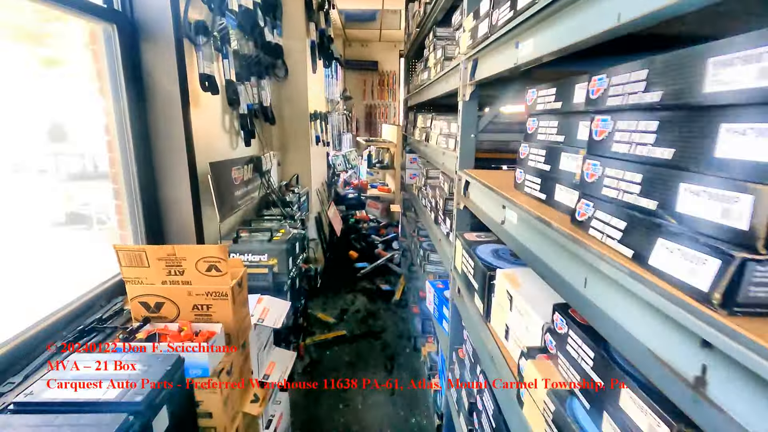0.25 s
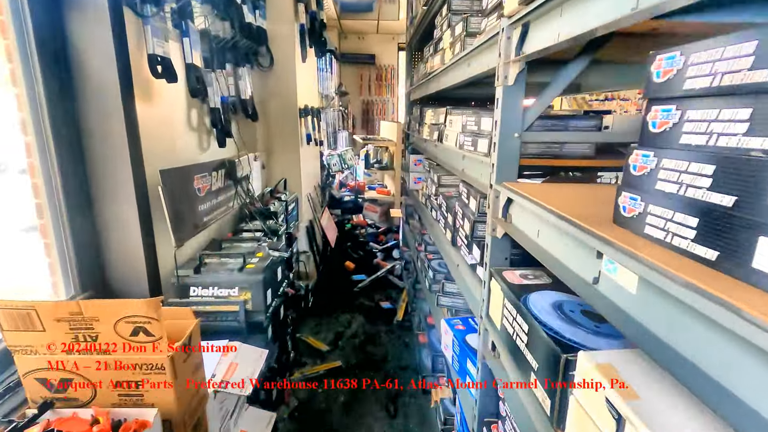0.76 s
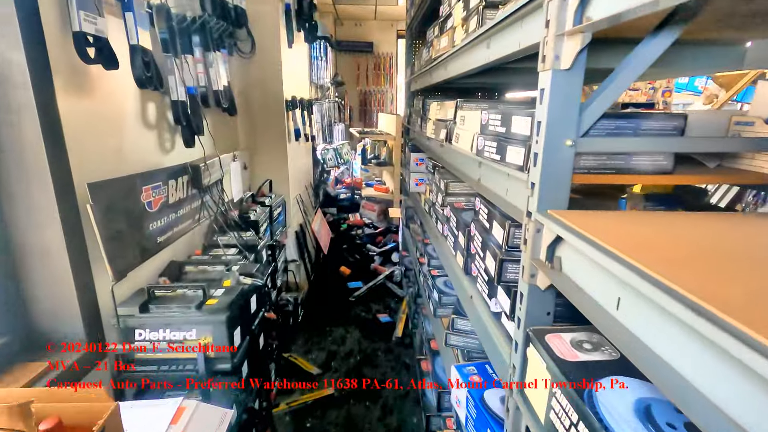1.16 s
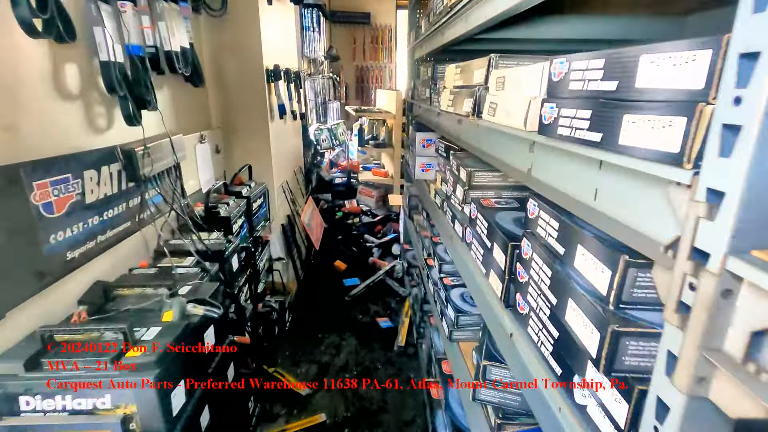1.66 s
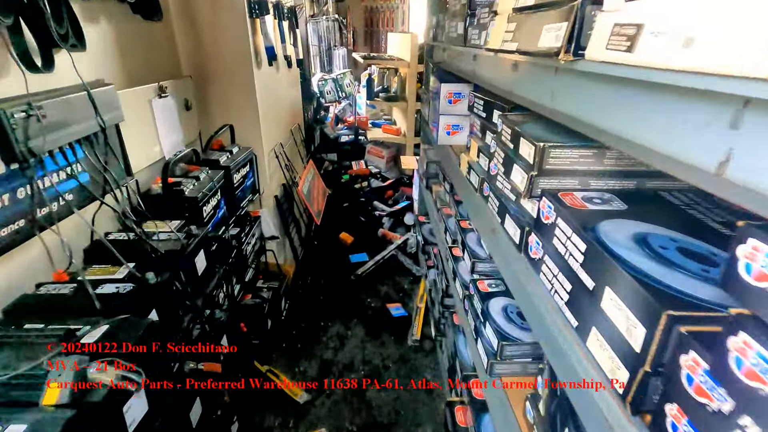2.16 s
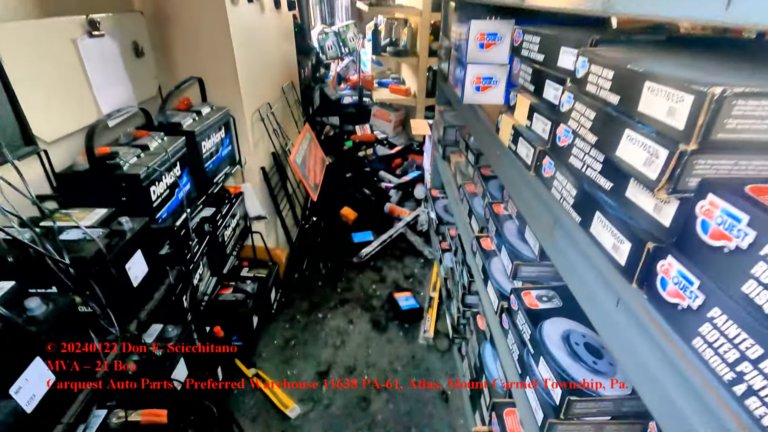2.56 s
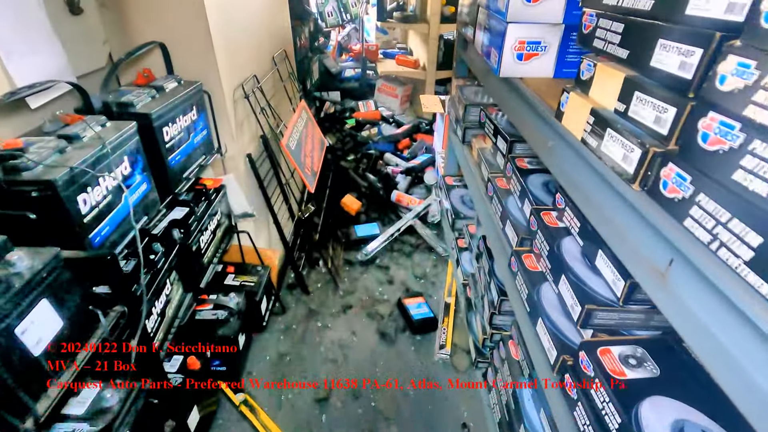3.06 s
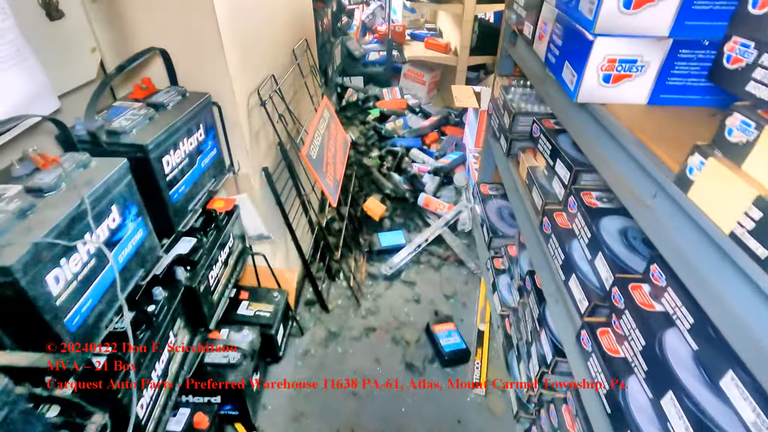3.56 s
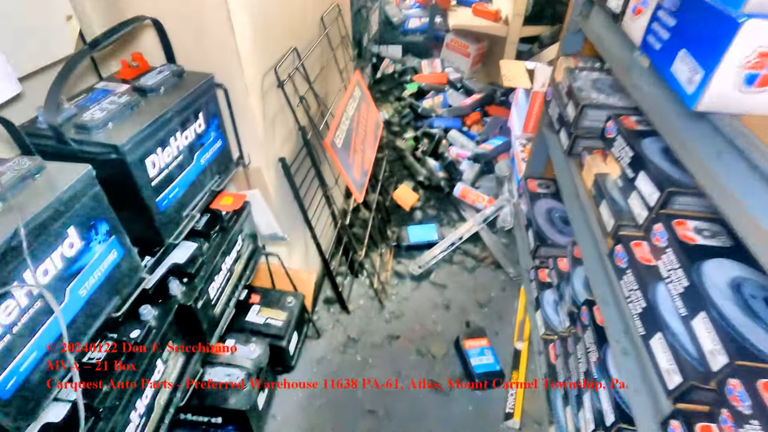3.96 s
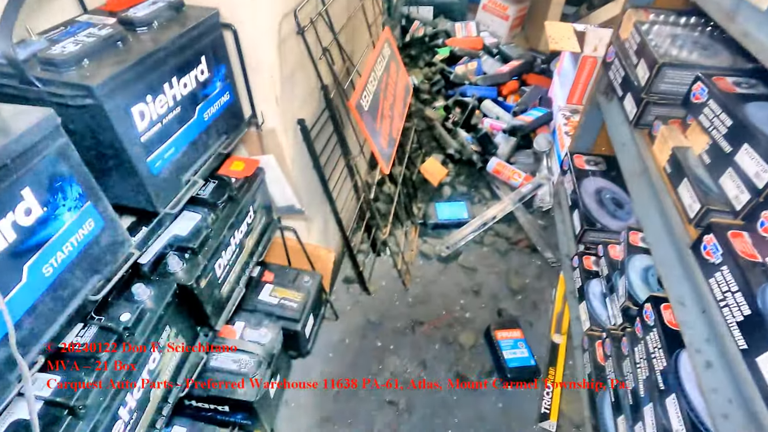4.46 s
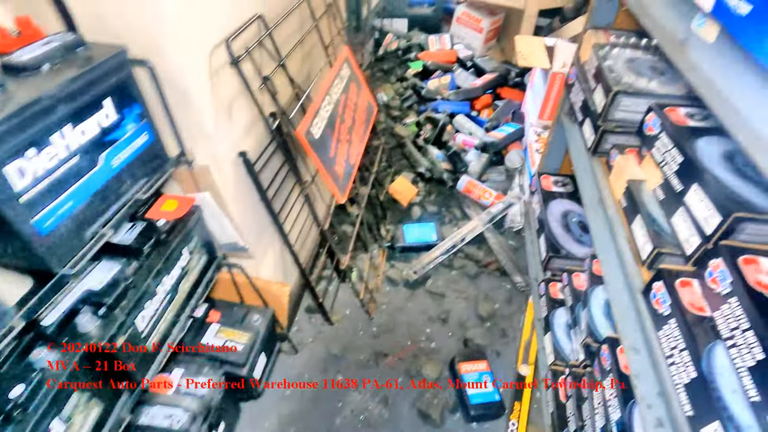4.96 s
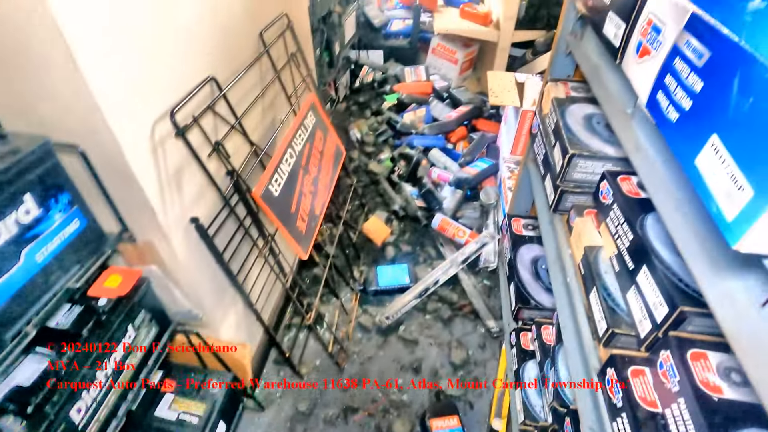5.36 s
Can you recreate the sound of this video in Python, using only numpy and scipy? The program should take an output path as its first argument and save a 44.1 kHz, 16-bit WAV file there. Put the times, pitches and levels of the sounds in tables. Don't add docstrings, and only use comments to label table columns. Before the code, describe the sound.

Slow gritty footsteps drag and crunch over loose debris on a concrete floor while a deep engine rumble throbs steadily outside.

```python
import sys
import numpy as np
from scipy import signal
from scipy.fft import rfft, irfft, next_fast_len
from scipy.io import wavfile

SR = 44100
rng = np.random.default_rng(int(sys.argv[2]) if len(sys.argv) > 2 else 0)


def generate_wav(sig):
    pcm = np.round(np.clip(np.atleast_2d(sig).T, -1, 1) * 32767).astype(np.int16)
    wavfile.write(sys.argv[1], SR, pcm)


def natural_amplitude(level_db):
    exponent = np.asarray(level_db, float) / 20
    return 10 ** exponent


N = 247822

# (firing rate [Hz], time of one firing [s], phase turn on the way in [rad])
ENGINES = [(35.03, -.0089, -.9), (37.55, .0007, 1.44), (30.02, 0, 2.8), (31.7, -.014, 2.6)]
ENGINE_ORDERS = [(0, 1), (0, 1.5), (0, 5 / 3), (0, 2), (0, 2.5), (0, 3), (0, 4), (1, 1), (1, 1.5), (1, 2),
                 (1, 2.5), (1, 3), (2, 1), (2, 2), (3, 1), (3, 2)]
# (mean rms [dB], swing [dB], loudest at [s])
STANDING_WAVES = [(-23.5, 0.97, 3), (-65, 11, -3.5), (-48.5, -5, -3), (-30, 2, 2.2), (-73, 9, 12),
                  (-45, 4.5, 0), (-62.5, 7.5, 0), (-32, 6.5, -2.5), (-60, 11, 7), (-42, 4.5, 1.4),
                  (-53.5, 5, 3.5), (-50.5, 2.5, 0.5), (-47.5, 10.5, 5.5), (-42, 2, 4), (-46.5, 2, 1),
                  (-52.5, 5.5, 4.5)]
WALK_M_PER_S, SOUND_M_PER_S = 0.4, 343

# (frequency [Hz], density [dB per Hz])
ROAR_SPECTRUM = [(20, -32), (40, -2.5), (65, 2), (100, -5), (150, -14), (230, -21), (500, -22.5),
                 (780, -28.5), (1000, -22.5), (1400, -23.5), (2500, -33), (4200, -35.5), (7500, -50),
                 (12000, -36)]
# (frequency [Hz], width [Hz], level [dB])
ROAR_WHINE = (1030, 28, 6.9)
ROAR_DB = -36.5

# (frequency [Hz], likeness [0..1])
LIKENESS = [(60, .9997), (150, .994), (300, .94), (600, .87), (1200, .76), (2400, .74), (5000, .48),
            (9000, .5), (13000, .72)]
# (frequency [Hz], left minus right [dB])
PORT_LEAN = [(700, 0), (1400, -.4), (2800, 1.6), (5500, 4.6), (8500, 7), (12000, 0)]

# (frequency [Hz], density [dB per Hz])
GRIT_SPECTRUM = [(130, -5), (258, -13.5), (380, -8.5), (450, -6), (780, -10), (984, -5), (1390, -6.5),
                 (2020, -6.5), (4500, -4.5), (7500, -10.5), (9000, -12), (12200, -12), (15400, -20)]
USUAL_WEIGHT_DB, USUAL_FINE_DB = -6.5, -27.5
# (frequency [Hz], width [Hz], level [dB])
SOLE_MODES = [(440, 370, -28), (900, 9.6, -34), (1224, 37, 3.5), (1420, 35, -12), (2400, 14, -14),
              (4300, 56, 4.5)]
# (full force at [s], level [dB], 20 dB rise [s], hold [s], 20 dB fall [s])
SLIDES = [(0, -37.5, .1, .1, 0.3), (0.226, -34.5, 0.13, 0.014, 0.07), (0.407, -56.5, -10, 0.0034, 4),
          (0.601, -46, -2.7, 0.0032, -2), (0.842, -21.5, 0.0461, 0.092, 0.1141),
          (0.81, -32.5, 0.12, 0.01, 0.08), (1.03, -58, -7, .003, 0.3), (1.429, -36.5, 0.1, 0.12, 0.13),
          (1.685, -44, .06, .01, 0.4), (1.823, -38.5, 0.3, 0.19, 0.32), (2.086, -32.5, 0.15, 0.0069, 0.05),
          (2.396, -49, 0.24, 0.18, -6.5), (2.853, -20, 0.1481, 0.068, 0.09),
          (3.036, -43, -0.25, 0.076, -0.5), (3.537, -35.5, 0.25, 0.036, 0),
          (3.778, -44.5, -0.1, 0.24, -0.5), (4.113, -35.5, 0.18, 0.052, 0.13), (4.42, -50, 0.1, .02, -0.3),
          (4.535, -49, 0.2, 0.11, 0), (4.77, -33, 0.05, 0.0088, 0.34), (4.864, -21, .045, 0.13, 0.0668),
          (5.067, -41.5, -0.3, .003, 0.05), (5.214, -44, 0.3, 0.27, -4), (5.563, -34, 0.14, 0.0023, -0.5),
          (5.612, -31.5, 0.16, 0.0032, -2)]
# (time [s], weight as low minus drag [dB], fine grit as top minus drag [dB])
STANCE = [(0, -2, -6), (.22, -13.5, -33), (.42, 3, -28), (.6, -8, -17), (.9, -10, -20.5), (1.05, -8, -23),
          (1.45, -3.5, -27), (1.91, -4.5, -13), (2.07, -9, -24), (2.4, 5, -13), (2.88, -6, -22),
          (3.05, -12.5, -22), (3.54, -7.5, -11), (3.85, 5, -12), (4.13, -7, -23), (4.5, -2, -13),
          (4.93, -5, -20), (5.6, 2, -17.5)]
# (time [s], level [dB], 20 dB fall [s], weight [dB], fine grit [dB])
LANDINGS = [(0.475, -44, 0.4, -2, -23), (0.67, -37.5, 0.18, -1, -12), (1.194, -45, 0.1, 9, -23),
            (1.24, -54.5, 0.3, 12, -40), (1.385, -46, 0.3, -12, -4), (1.801, -41.5, 0.47, 2, -33),
            (2.51, -44.5, 0, -2, -4), (2.659, -34.5, 0.23, -6.5, -19.5), (3.129, -35, 0.13, -8, -20),
            (3.23, -40.5, 0.06, -1, -32), (3.352, -39.5, 0.76, 2, -38), (3.59, -45, 0, -4, -14),
            (3.63, -37, 0, -9, -27), (3.7, -39.5, 0.1, -2, -7), (4.735, -34, 0.36, -1.5, -25),
            (4.839, -23.5, 0.084, -1, -17), (5.255, -48, -0.1, -6, -22), (5.403, -40, 0.1, 16.5, -25.5),
            (5.44, -44.5, 0.16, 0, -21.5), (5.531, -37, -0.6, 13, -32)]
LANDING_RISE_S, LANDING_HOLD_S = 0.0075, 0.0066
HOLD_SAG_DB_PER_S, CREEP_DB = 10, -75

# (time [s], pitch [Hz], level [dB])
SQUEAKS = [
    [(.222, 2600, -52), (.232, 2620, -40), (.255, 2640, -40), (.272, 2640, -54)],
    [(3.275, 6800, -72), (3.29, 6950, -61), (3.345, 7800, -60), (3.365, 8050, -72)],
]

# (time [s], peak [dB], ring [Hz], second ring [Hz], second ring [dB])
GRINDS = [(.785, -36, 4460, 2600, -4), (.828, -20.5, 1300, 7600, 1), (.845, -16, 3460, 5860, 3),
          (.868, -17.5, 4800, 2400, -12), (.888, -16, 4250, 3750, 0), (.915, -21, 2300, 5500, -2),
          (1.325, -41, 3700, 4630, -10), (1.448, -28.5, 1120, 3600, -2), (2.82, -14.5, 2460, 4700, -5),
          (2.838, -16, 2900, 1690, -9), (2.86, -18, 4270, 6000, -5), (2.885, -20, 5000, 1330, -3),
          (2.9, -24, 3800, 580, -7), (2.95, -24.5, 6000, 4300, 1), (3.372, -33.5, 1310, 730, -1.5),
          (4.755, -30.5, 5000, 900, 1), (4.775, -32, 2300, 780, -2), (4.845, -18, 2300, 804, -2),
          (4.885, -19.5, 1220, 4250, -1), (4.98, -23, 4060, 3000, -2), (5.255, -39.5, 5440, 7000, -2),
          (5.44, -36, 5000, 900, -2)]
# (time [s], peak [dB], ring [Hz], second ring [Hz], second ring [dB])
CRUSHES = [(.228, -31, 4300, 5100, -23), (.872, -25, 440, 670, -36), (.91, -21.5, 440, 1380, 3),
           (1.41, -28, 3960, 5600, -19), (1.671, -31, 4600, 3200, -7), (2.072, -23, 4300, 1300, -10),
           (2.669, -33, 5000, 1240, 7), (2.78, -28.5, 510, 900, -15), (3.352, -24.5, 1840, 656, -7),
           (3.43, -27, 3060, 1230, -2), (4.09, -26.5, 1110, 1890, -1.5), (5.538, -19, 565, 1180, 0.5)]
# (time [s], peak [dB], ring [Hz], second ring [Hz], second ring [dB])
TICKS = [(.474, -13, 1610, 1140, -7.5), (.475, -21.5, 2810, 5670, -2), (.479, -22.5, 4460, 3400, 1),
         (.489, -24, 1730, 2880, -2), (.499, -27, 1830, 2680, 2), (1.197, -28, 900, 3320, -9),
         (1.204, -24.5, 2510, 2130, -2), (1.232, -30.5, 900, 2800, -1), (1.803, -24, 3400, 490, 1.5),
         (2.507, -30, 1510, 4060, -7), (3.048, -32.5, 3100, 5500, 3), (3.098, -29, 3250, 530, -9),
         (3.151, -30, 1246, 4400, -8), (3.156, -20, 1230, 600, -10.5), (3.168, -41, 1280, 4500, -6),
         (3.207, -42, 6300, 4500, -2), (3.229, -30, 1300, 2900, -7.5), (3.237, -25, 4400, 2930, 0),
         (3.341, -37, 1900, 1000, 0), (3.699, -23, 7140, 4500, -2), (3.737, -30.5, 1200, 2020, -2),
         (3.779, -33, 5230, 8500, 8), (3.811, -24.5, 1190, 1930, -6), (4.842, -13.5, 434, 810, 4),
         (5.405, -26.5, 2510, 6600, -5), (5.547, -14.5, 4100, 7870, 2)]
# (time [s], peak [dB], ring [Hz], second ring [Hz], second ring [dB])
KNOCKS = [(.671, -29, 1050, 4500, -4), (.829, -24, 4480, 6530, -1), (1.934, -28.5, 1180, 2000, -7),
          (2.658, -21.5, 2580, 3450, -0.5), (2.77, -16, 1610, 2410, -1), (3.132, -27, 6640, 2980, -11),
          (3.57, -28.5, 3150, 1130, -6), (3.627, -18.5, 3750, 2640, -3.5), (3.679, -28, 1140, 2290, -2),
          (3.72, -22.5, 11500, 7500, -12), (4.722, -33.5, 700, 2280, 2), (4.735, -28, 5900, 7400, 2),
          (4.839, -9.5, 1150, 2330, 1), (4.982, -22.5, 1010, 516, 0), (5.402, -22, 607, 1290, -4),
          (5.525, -21, 1610, 1120, -10), (5.61, -44, 4300, 640, -4)]
TICK_S, KNOCK_S, CRUSH_S, GRIND_S, CRUSH_RISE_S = 0.0033, 0.011, 0.019, 0.023, 0.0046
RING_CYCLES, CRACK_DB = 13.7, -17.5
HIT_TILT_DB = 0.6

# (time [s], peak [dB], pitch [Hz], t60 [s])
HEELS = [
    (0.667, -19.5, 136, 0.087),
    (.674, -18, 138, 0.083),
    (0.842, -24, 138, 0.18),
    (2.788, -36, 120, 0.093),
    (3.99, -17, 155, 0.015),
    (4.169, -34, 271, 0.11),
    (4.84, -21, 128, 0.072),
    (4.975, -23.5, 241, 0.15),
    (5.282, -35, 300, 0.13),
    (5.612, -45, 132, 0.073),
]

AISLE_T60_S, AISLE_DB, AISLE_HZ = 0.098, -10, 5960
# (frequency [Hz], gain [dB])
MIC_RESPONSE = [(7700, 0.5), (8500, -8.5), (14500, -28), (15700, -41)]
# (frequency [Hz], left lead [rad])
PORT_PHASE = [(0, 0), (3360, -1.0), (3960, -0.8), (4480, -0.8), (5510, 0.0), (10300, -0.1), (11600, 0.1),
              (15200, -0.0)]


def rms_one(x):
    return x / np.sqrt(np.mean(x ** 2) + 1e-20)


def in_time(rows):
    s, *columns = np.transpose(rows)
    return [np.interp(np.arange(N) / SR, s, c) for c in columns]


def at_hz(points, hz):
    points_hz, values = np.transpose(points)
    return np.interp(np.log(hz), np.log(points_hz), values)


def drift(rate_hz):
    r = np.exp(-80 * np.pi * rate_hz / SR)
    white = rng.standard_normal(N // 40 + 2002)
    slow = signal.lfilter([1], [1, -2 * r, r * r], white)[2000:]
    return np.interp(np.arange(N) / 40, np.arange(len(slow)), rms_one(slow))


def ring(push, hz, t60_s):
    r, w = natural_amplitude(-60 / (t60_s * SR)), 2 * np.pi * hz / SR
    return signal.lfilter([0, np.sin(w)], [1, -2 * r * np.cos(w), r * r], push + 1e-18)


def width_t60_s(width_hz):
    return np.log(1000) / (np.pi * width_hz)


def banded(white, spectrum, edges_hz, shift_db, patchy_db, rate_hz):
    out, power = 0, 0
    for k, (low, high) in enumerate(zip(edges_hz, edges_hz[1:])):
        band = signal.butter(2, [low, high], "band", fs=SR, output="sos")
        mid, side = signal.sosfilt(band, white[k % 2])
        hz = np.sqrt(low * high)
        alike = np.clip(at_hz(LIKENESS, hz), 0, 1)
        pair = np.sqrt((1 + alike) / 2) * mid + np.sqrt((1 - alike) / 2) * side * [[1], [-1]]
        lean = natural_amplitude(at_hz(PORT_LEAN, hz) * np.array([[0.5], [-0.5]]))
        gain = natural_amplitude(at_hz(spectrum, hz))
        power += gain ** 2 * (high - low) * 2 / SR
        out = out + gain * natural_amplitude(shift_db(hz) + patchy_db * drift(rate_hz)) * pair * lean
    return out / np.sqrt(power)


def engines():
    t, out = np.arange(N) / SR, np.zeros(N)
    for (which, multiple), (mean_db, swing_db, loudest_s) in zip(ENGINE_ORDERS, STANDING_WAVES):
        firing_hz, fired_s, turn_rad = ENGINES[which]
        hz = multiple * firing_hz
        crests = 2 * WALK_M_PER_S * hz / SOUND_M_PER_S * (t - loudest_s)
        level_db = mean_db + swing_db * np.cos(2 * np.pi * crests) + 0.56 * multiple * drift(0.96)
        out += np.sqrt(2) * natural_amplitude(level_db) * np.cos(2 * np.pi * hz * (t - fired_s) + turn_rad)
    return out


def roar():
    edges_hz = 22 * 2 ** np.arange(0, 9.6, 0.5)
    white = rng.standard_normal((2, 2, N))
    noise = banded(white, ROAR_SPECTRUM, edges_hz, lambda hz: 0, patchy_db=1.96, rate_hz=22.0)
    hz, width_hz, db = ROAR_WHINE
    whine = natural_amplitude(db) * np.pi * width_hz / SR * ring(noise, hz, width_t60_s(width_hz))
    return natural_amplitude(ROAR_DB) * (noise + whine)


def stroke(s, db, rise_s, hold_s, fall_s):
    t = np.arange(0, N, 16) / SR - s
    rise_db = 20 * np.minimum(t, 0) / max(rise_s, 1e-3)
    fall_db = 20 * np.maximum(t - hold_s, 0) / max(fall_s, 1e-3)
    sag_db = HOLD_SAG_DB_PER_S * np.clip(t, 0, max(hold_s, 0))
    return natural_amplitude(2 * np.maximum(db + rise_db - fall_db - sag_db, -120))


def footwork():
    power = natural_amplitude(2 * CREEP_DB) + sum(stroke(*row) for row in SLIDES)
    weighted = power * np.array(in_time(STANCE))[:, ::16]
    for s, db, fall_s, weight_db, fine_db in LANDINGS:
        landing = stroke(s, db, LANDING_RISE_S, LANDING_HOLD_S, fall_s)
        power = power + landing
        weighted = weighted + landing * np.array([[weight_db], [fine_db]])
    return np.repeat([10 * np.log10(power), *(weighted / power)], 16, axis=1)[:, :N]


def drag():
    drag_db, weight_db, fine_db = footwork()
    sizes = natural_amplitude(0.75 * np.minimum(rng.exponential(1, (2, 1, N)), 5))
    rolling = rng.random((2, 1, N)) < 9000 / SR
    grains = rms_one(rng.standard_normal((2, 2, N)) * (sizes * rolling + 0.2))

    def shift_db(hz):
        heavy = at_hz([(1100, 0.89), (2300, 0.14), (5000, 0.0091)], hz)
        fine = at_hz([(4500, 0.0048), (7600, 0.11), (9000, 0.49)], hz)
        return heavy * (weight_db - USUAL_WEIGHT_DB) + fine * (fine_db - USUAL_FINE_DB)

    edges_hz = 130 * 2 ** np.arange(0, 7.1, 1 / 3)
    judder = natural_amplitude(0.5 * drift(21))
    noise = banded(grains, GRIT_SPECTRUM, edges_hz, shift_db, patchy_db=1.02, rate_hz=33.0)
    hiss = natural_amplitude(drag_db + 1.32) * judder * noise
    out = hiss
    for hz, width_hz, db in SOLE_MODES:
        mode = ring(hiss, hz, width_t60_s(width_hz))
        out = out + natural_amplitude(db - 8.5) * 2 * np.pi * width_hz / SR * mode
    return out


def squeak():
    t, out = np.arange(N) / SR, np.zeros(N)
    for rows in SQUEAKS:
        hz, level_db = in_time(rows)
        sounding = (t > rows[0][0]) * (t < rows[-1][0])
        cycles = np.cumsum(hz * (1 + 0.0079 * drift(91))) / SR
        out += natural_amplitude(level_db + 3.1 * drift(120)) * np.sin(2 * np.pi * cycles) * sounding
    return out


def debris_piece(hz, second_hz, second_db, lasts_s):
    span = SR // 7
    t = np.arange(span) / SR
    fade = np.exp(-t / lasts_s)
    if lasts_s > KNOCK_S:
        fade = fade * (1 - np.exp(-t / CRUSH_RISE_S))
    contacts_per_s = 800 if lasts_s <= KNOCK_S else 2500
    touching = (rng.random(span) < contacts_per_s / SR) * fade * 0.8
    touching[0] = fade[0] * (1 if lasts_s < KNOCK_S else 0.4)
    body = 0
    for centre_hz, level_db in [(hz, 0), (second_hz, second_db)]:
        t60_s = RING_CYCLES / centre_hz + 0.0063
        for ratio, db in [(0.83, -13), (0.92, -8), (1, 1.5), (1.09, -5), (1.2, -11)]:
            contacts = touching * rng.choice([-1, 1], span)
            body = body + natural_amplitude(level_db + db) * ring(contacts, centre_hz * ratio, t60_s)
    crisp = signal.butter(2, [1500, 9500], "band", fs=SR, output="sos")
    crack = signal.sosfilt(crisp, rng.standard_normal(span) * fade)
    return body / np.abs(body).max() + natural_amplitude(CRACK_DB) * crack / np.abs(crack).max()


def debris():
    out = np.zeros(N + SR)
    for rows, lasts_s in [(TICKS, TICK_S), (KNOCKS, KNOCK_S), (CRUSHES, CRUSH_S), (GRINDS, GRIND_S)]:
        for s, peak_db, hz, second_hz, second_db in rows:
            piece = debris_piece(hz, second_hz, second_db, lasts_s)
            out[round(s * SR):][:len(piece)] += natural_amplitude(peak_db + 1.0) * piece
    return out[:N]


def heels():
    out = np.zeros(N)
    for s, peak_db, hz, t60_s in HEELS:
        push = np.zeros(N)
        push[round(s * SR)] = -natural_amplitude(peak_db)
        out += ring(push, hz, t60_s) + natural_amplitude(-15.5) * ring(push, 1.495 * hz, 1.3 * t60_s)
    return signal.sosfilt(signal.butter(4, 330, fs=SR, output="sos"), out)


def aisle(x):
    t = np.arange(SR // 2) / SR
    shared, own = rng.standard_normal(len(t)), rng.standard_normal((2, len(t)))
    echoes = (shared + 0.5 * own) * natural_amplitude(-60 * t / AISLE_T60_S) * (t > 0.004)
    echoes = signal.sosfilt(signal.butter(1, AISLE_HZ, fs=SR, output="sos"), echoes)
    echoes = echoes / np.sqrt(np.sum(echoes ** 2) / 2)
    return natural_amplitude(AISLE_DB) * signal.fftconvolve(x[None], echoes, axes=1)[:, :N]


def scene():
    hits, sole = debris() + squeak(), drag()
    bright = signal.sosfilt(signal.butter(1, [3500, 10000], "band", fs=SR, output="sos"), hits)
    near = hits * natural_amplitude([[HIT_TILT_DB], [-HIT_TILT_DB]]) + 0.3 * bright * [[1], [-1]]
    echoes = aisle(hits + 0.5 * sole.mean(axis=0))
    return near + echoes + heels() + sole + roar() + engines()


def top_cut(x):
    return signal.sosfilt(signal.butter(12, 15590, fs=SR, output="sos"), x)


def record(dry):
    size = next_fast_len(N + 4096)
    hz = np.maximum(np.fft.rfftfreq(size, 1 / SR), 1)
    lead_rad = np.interp(hz, *np.transpose(PORT_PHASE))
    apart = np.exp(0.5j * lead_rad * np.array([[1], [-1]]))
    heard = irfft(rfft(dry, size) * natural_amplitude(at_hz(MIC_RESPONSE, hz)) * apart, size)[:, :N]
    return top_cut(0.85 * np.tanh(heard / 0.96))


dry = scene()
out = record(dry)
generate_wav(out)
```